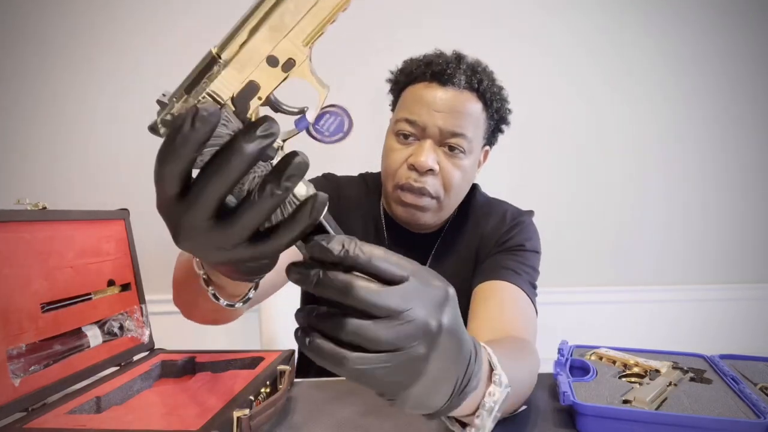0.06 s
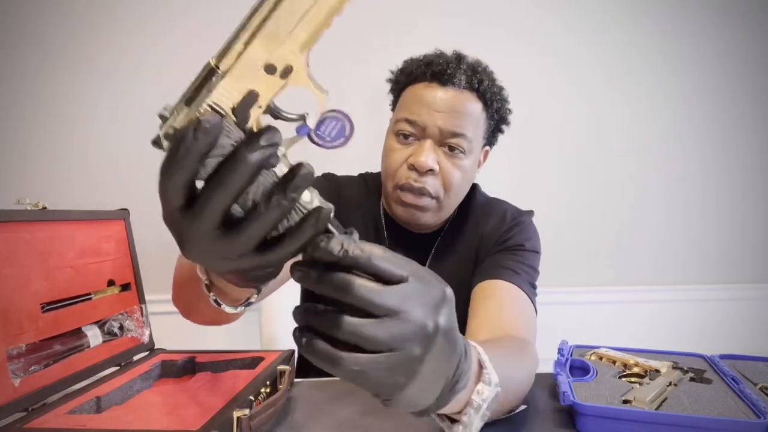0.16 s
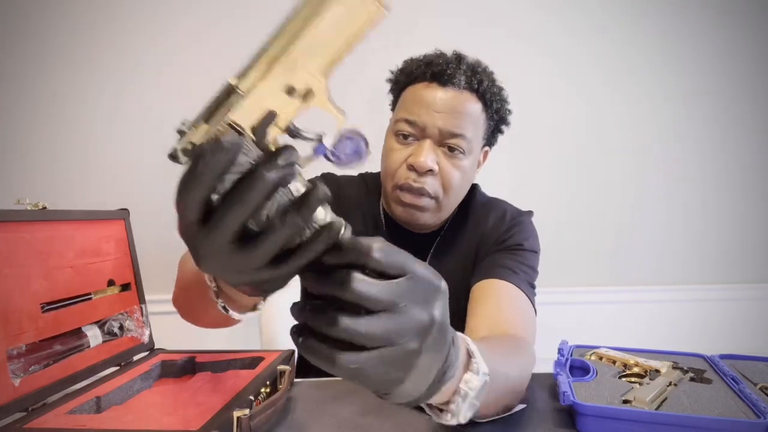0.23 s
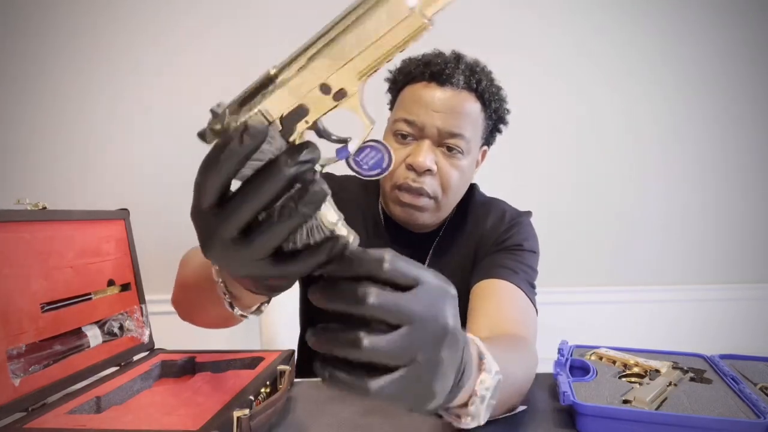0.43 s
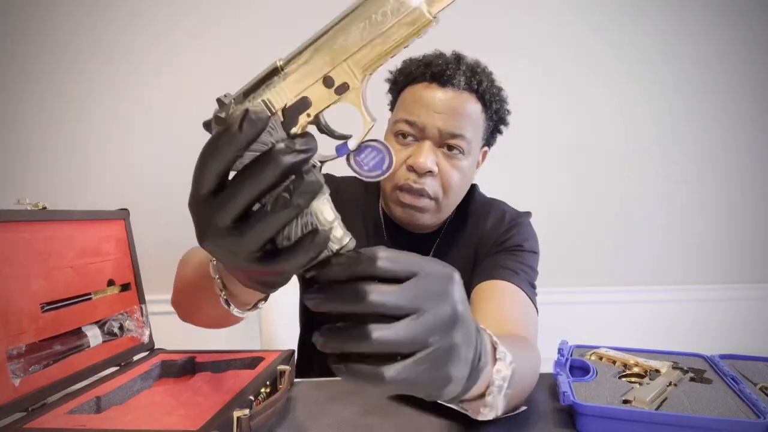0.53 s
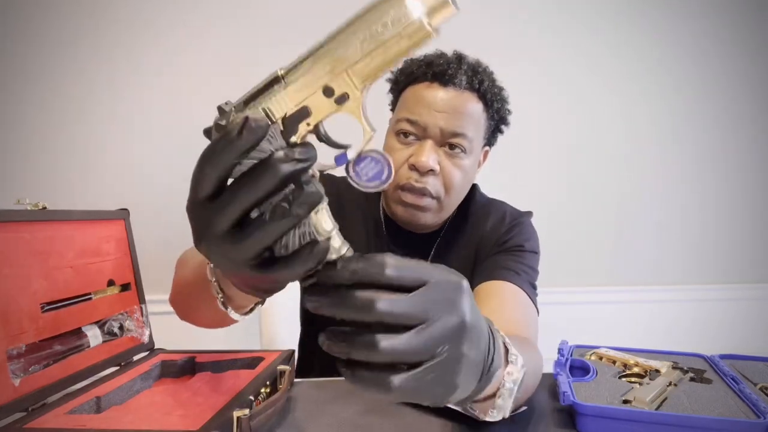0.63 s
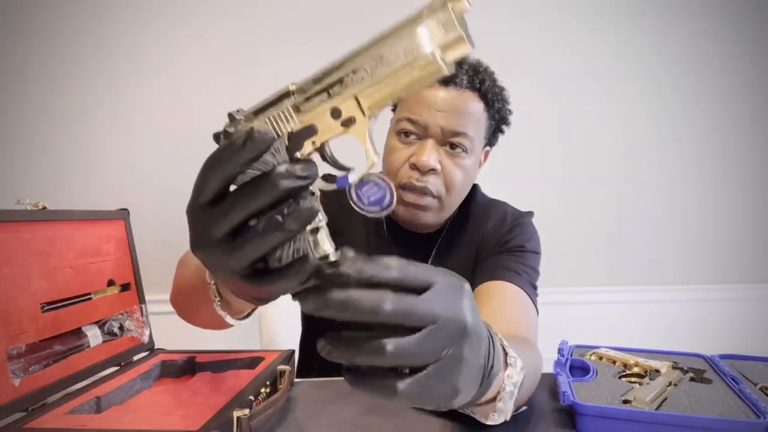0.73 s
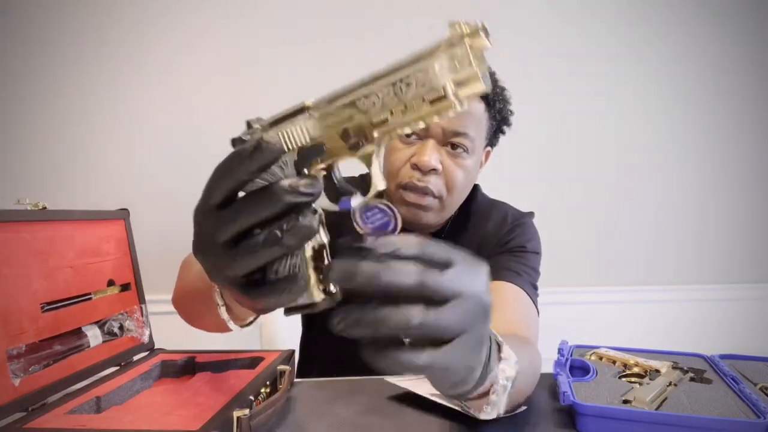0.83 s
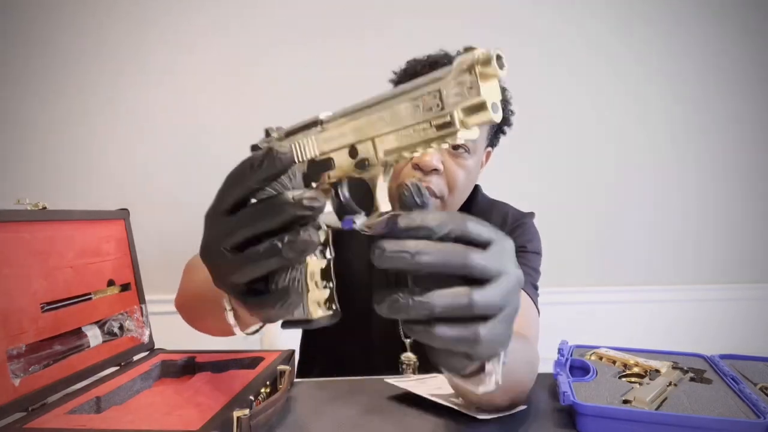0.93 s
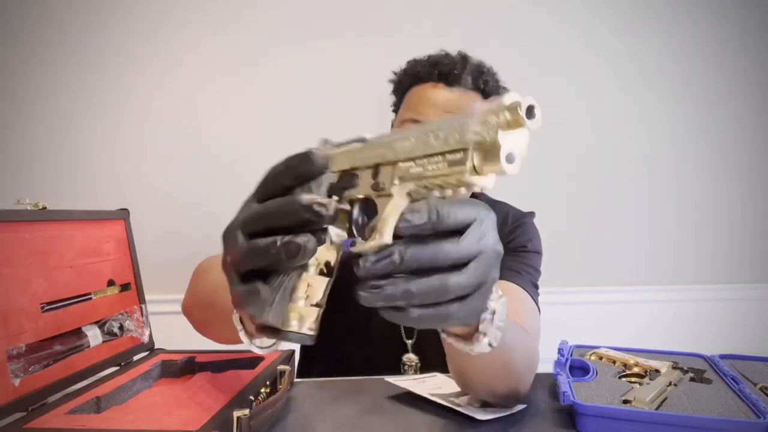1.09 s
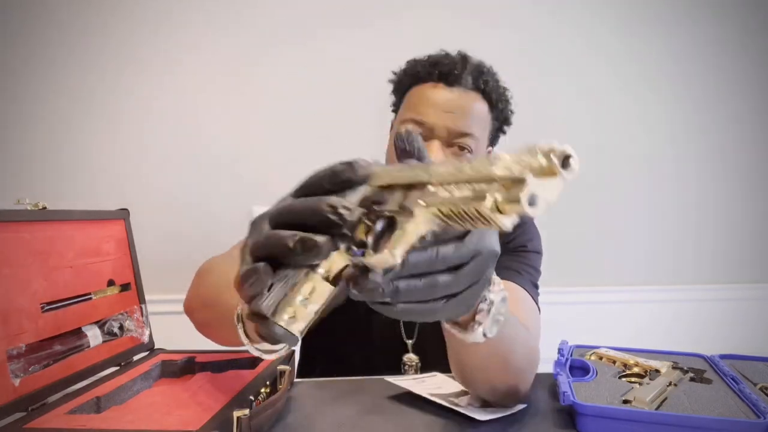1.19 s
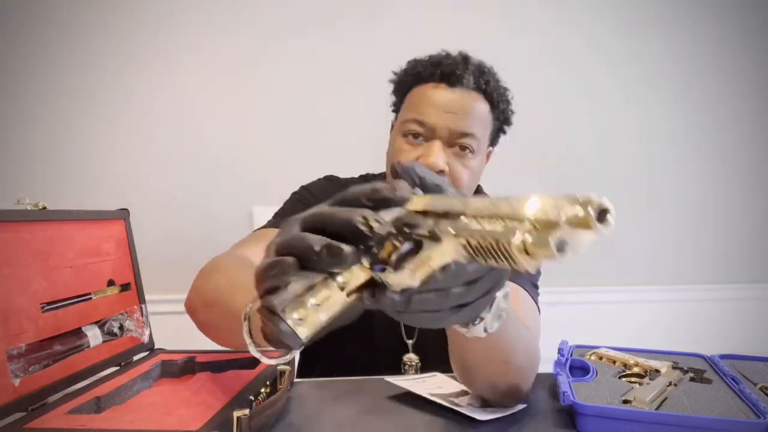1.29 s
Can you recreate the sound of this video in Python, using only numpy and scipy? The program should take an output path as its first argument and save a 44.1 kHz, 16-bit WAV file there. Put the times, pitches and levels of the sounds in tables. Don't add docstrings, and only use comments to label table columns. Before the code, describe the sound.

A magazine is pushed into a pistol: a light metal click, a brief scrape, then a loud double clack and bright short room ring; later a faint gloved pat and soft rustle, close stereo microphone, low hum.

```python
import sys
import numpy as np
from scipy import signal
from scipy.fft import rfft, irfft
from scipy.io import wavfile
from scipy.ndimage import uniform_filter1d

SR = 44100
rng = np.random.default_rng(int(sys.argv[2]) if len(sys.argv) > 2 else 0)


def persist_wave(psi):
    counts = np.round(np.clip(psi, -1, 1) * 32767).astype(np.int16)
    wavfile.write(sys.argv[1], SR, np.atleast_2d(counts).T)


def boost_factor(decibels):
    exponent = np.asarray(decibels, float) / 20
    return 10 ** exponent


N = 59535
LEAD = 8192
SIZE = N + LEAD

# frequency in Hz, level in dB per Hz.
AIR_COLOUR = [(25, -29), (60, 2.5), (130, -11), (300, -8.5), (480, -56), (900, -47)]
# frequency in Hz, left-right correlation.
AIR_LIKENESS = [(60, 0.72), (240, 0.36), (950, -1.5), (3770, -0.03), (15000, 0.17)]
# frequency in Hz, left over right in dB.
AIR_PAN = [(60, 12), (180, -16), (550, 62.5), (5000, 8), (15000, -7)]
# frequency in Hz, width in Hz, level in dB.
HUM_LINES = [(63, 6, -81), (128, 5, -72.5), (163.5, 6, -74.5), (207.4, 1.9, -66.5), (242, 29, -77.5),
             (320, 9.4, -76.5)]
# time in seconds, level in dB.
GLOVE_LEVEL = [(.5, -68), (.7, -72.5), (.74, -57), (.81, -67.5), (.9, -68.5), (.94, -64), (1.01, -74),
               (1.03, -79), (1.115, -79.5), (1.145, -59), (1.23, -67), (1.35, -65.5)]
# frequency in Hz, level in dB per Hz.
GLOVE_SPECTRUM = [(1000, -19), (2500, -14), (4000, -9), (6000, 0), (7500, -8), (10000, 1), (14000, -10),
                  (16000, -22)]

# frequency in Hz, time to fall 60 dB in seconds.
TAIL_T60 = [(500, 0.84), (1000, 0.32), (2000, 0.62), (4000, 0.54), (7000, 0.52), (11000, 0.41),
            (15000, 0.1)]
# frequency in Hz, level in dB.
TAIL_COLOUR = [(250, -25), (520, -4.5), (750, 1), (1200, 1.5), (2000, 0.5), (4500, -1), (15000, 1)]
# frequency in Hz, left-right correlation.
TAIL_LIKENESS = [(60, -0.045), (240, 1), (950, 0.45), (3770, -0.46), (15000, 0.13)]
# frequency in Hz, left over right in dB.
TAIL_PAN = [(60, 25.5), (180, 0), (550, -0.5), (1650, -3), (4970, 4.5), (15000, -3.5)]
MIRROR_S = [.0027, .0120, .0146, .0160, .0183, .0204, .0228, .0262, .0315]
# left level in dB, right level in dB.
MIRROR_LEVEL = [(-14, -7), (-8, -5), (-10.5, -13), (-12.5, -16.5), (-16.5, -19.5), (-19, -24),
                (-21.5, -22.5), (-13, -24.5), (-21.5, -12)]
# frequency in Hz, level in dB.
MIRROR_COLOUR = [(1200, -29.5), (2300, -6), (3100, 2), (4000, -4), (5200, -12.5), (7000, -12), (9500, -7.5),
                 (13000, -26)]
# frequency in Hz, level in dB.
STEEL_CLICK = [(600, -25.5), (1500, -12), (2400, -8), (3100, 0), (4300, 3.5), (6300, -2), (10000, -8),
               (15000, -9.5)]
# frequency in Hz, level in dB.
GLOVED_CLICK = [(500, -15.5), (750, -11), (1200, -7), (2200, 1), (3500, -12), (6000, -14.5), (12000, -23)]
# frequency in Hz, left over right in dB.
PORT_PAN = [(60, 22), (130, -8), (290, -14.5), (640, -8), (1410, 11), (3100, 3.5), (5000, 9), (7500, 1.5),
            (15000, -6)]
# frequency in Hz, width in Hz, depth in dB.
HOUSING_DIPS = [(8250, 950, -8), (12450, 1240, -38.5), (16300, 1300, -10.5)]

# time in seconds, level in dB.
SLIDE_LEVEL = [(.1, -69), (.15, -59), (.165, -52.5), (.19, -57), (.225, -52.5), (.233, -35), (.243, -37.5),
               (.25, -77)]
# frequency in Hz, level in dB.
SLIDE_MODES = [(600, -7), (1750, 8.5), (2500, -0.5), (3700, -3), (4750, -2.5), (5500, -0.5), (6720, -2.5)]
# frequency in Hz, width in Hz, level in dB.
LIP_MODES = [(1086, 83, -5), (1804, 590, -13.5), (2760, 400, -18), (3878, 310, 1.5), (4610, 430, -9.5),
             (5295, 320, -8), (7073, 110, -7), (6660, 210, -19.5), (9900, 1500, -18.5), (13500, 420, -27)]
GRAZE_MODES = [(1270, 500, -5), (2050, 1400, -2), (3900, 400, 5), (5340, 430, 5), (7200, 720, -10.5)]
KNOCK_MODES = [(1060, 270, -19), (1670, 290, -17), (2090, 280, -22.5), (4100, 620, -23.5)]
CATCH_MODES = [(1066, 840, -17.5), (1593, 370, -14), (2330, 120, -14.5), (4120, 130, -0.5), (5340, 400, 2),
               (6050, 300, -6), (6800, 100, -19.5), (9730, 280, -6.5), (11600, 170, -13.5),
               (13800, 520, -23.5), (15300, 240, -7)]
SEAT_MODES = [(1202, 2300, -21.5), (1923, 150, -13), (3148, 380, -1.5), (4778, 520, 1.5), (5770, 1200, -19),
              (6840, 130, -9), (9360, 660, -6.5), (10500, 900, -15), (14020, 860, -13.5),
              (15900, 1300, -11.5)]
PALM_MODES = [(704, 180, -2), (1040, 280, -9.5), (1663, 280, -2), (2223, 183, 1.5), (2970, 740, -6),
              (4150, 440, 0), (5470, 480, 0), (8010, 360, -13), (9430, 500, -12), (14460, 900, -27)]
HEEL_MODES = [(729, 260, -1.5), (1953, 500, -10)]
# start in seconds, peak in dB, crack in dB, click sent to the room in dB,
# left over right in dB.
BLOWS = [(-.12, -23.5, -19, -2, 3), (0.0922, -23, -5.5, -1.5, 6), (0.1557, -39, 1, 6.5, 9.5),
         (0.1642, -40.5, -3.5, -4.5, 0.5), (0.1664, -38.5, -7.5, 1.5, -7.5), (0.2069, -32.5, -37.5, -9, -3),
         (0.209, -39, -32.5, -4.5, -1), (0.229, -7, 0, -10.5, 1.5), (0.2438, -4.5, -6.5, 3, 5),
         (0.5092, -29, -8, 1.5, 4), (.5125, -39, -29.5, -9, 1)]
STRUCK = [SEAT_MODES, LIP_MODES, GRAZE_MODES, GRAZE_MODES, GRAZE_MODES, KNOCK_MODES, KNOCK_MODES,
          CATCH_MODES, SEAT_MODES, PALM_MODES, HEEL_MODES]

CRACK_S = 0.001195
TO_LEFT_RIGHT = np.array([[.5], [-.5]])


def rms_one(x):
    return x / np.sqrt(np.mean(x ** 2) + 1e-20)


def at_hz(points, hz):
    table_hz, value = np.array(points).T
    return np.interp(np.log(np.maximum(hz, 1)), np.log(table_hz), value)


def in_time(rows):
    return np.interp((np.arange(SIZE) - LEAD) / SR, *np.transpose(rows))


def highpass(x, order, hz):
    return signal.sosfilt(signal.butter(order, hz, "high", fs=SR, output="sos"), x)


def resonate(x, hz, width_hz):
    r = np.exp(-np.pi * width_hz / SR)
    poles = [1, -2 * r * np.cos(2 * np.pi * hz / SR), r * r]
    return signal.lfilter([(1 - r * r) / 2, 0, (r * r - 1) / 2], poles, x + 1e-18)


def coloured(x, db_at):
    size = x.shape[-1]
    return irfft(rfft(x) * boost_factor(db_at(np.arange(size // 2 + 1) * SR / size)), size)


def stereo_bands(gain_at, alike, balance, size):
    out = 0
    white = rng.standard_normal((2, 2, size))
    for k, low in enumerate(20 * 2 ** np.arange(0, 10, .5)):
        edges = [low, min(low * np.sqrt(2), 19000)]
        band = signal.butter(2, edges, "band", fs=SR, output="sos")
        mid, side = signal.sosfilt(band, white[k % 2])
        hz = low * 2 ** .25
        c = np.clip(at_hz(alike, hz), 0, 1)
        pan = boost_factor(at_hz(balance, hz) * TO_LEFT_RIGHT)
        pair = np.sqrt(1 + c) * mid + np.sqrt(1 - c) * side * [[1], [-1]]
        out = out + gain_at(hz) * pan * pair
    return out


def air():
    level_db, top_hz, steady = -63, 1000, .6
    tone_bands = stereo_bands(lambda hz: boost_factor(at_hz(AIR_COLOUR, hz)) / (1 + (hz / top_hz) ** 6),
                              AIR_LIKENESS, AIR_PAN, SIZE)
    out = boost_factor(level_db) * rms_one(tone_bands)
    for hz, width_hz, db in HUM_LINES:
        line = resonate(rng.standard_normal(SIZE + SR), hz, 2 * width_hz)
        line = resonate(line, hz, 2 * width_hz)[SR:]
        tone = np.sqrt(2) * np.sin(2 * np.pi * hz * np.arange(SIZE) / SR)
        out += boost_factor(db + np.array([[2.5], [-2.5]])) * (steady * tone + (1 - steady) * rms_one(line))
    return out


def gloves():
    hiss = stereo_bands(lambda hz: boost_factor(at_hz(GLOVE_SPECTRUM, hz) - 60 * (hz < 900)),
                        [(100, 0.32), (9000, 0.1)], AIR_PAN, SIZE)
    return boost_factor(in_time(GLOVE_LEVEL)) * rms_one(hiss)


def room(x):
    level_db, near_db, wall_s = -16.5, -9.5, .0125
    early_db, early_s, early_per_s = 4, 0.0046, 900
    t = np.arange(SR) / SR
    tail = stereo_bands(lambda hz: boost_factor(at_hz(TAIL_COLOUR, hz) - 60 * t / at_hz(TAIL_T60, hz)),
                        TAIL_LIKENESS, TAIL_PAN, SR)
    arrivals = rng.random(SR) < early_per_s / SR
    echoes = uniform_filter1d(arrivals * SR / early_per_s, size=12)
    early = boost_factor(early_db) * np.exp(-np.abs(t - wall_s) / early_s) * np.sqrt(echoes)
    tail *= np.where(t < wall_s, boost_factor(near_db), 1 + early)
    return boost_factor(level_db) * signal.fftconvolve(x[None], tail, axes=1)[:, :len(x)]


def mirrors(x):
    thin = coloured(x, lambda hz: at_hz(MIRROR_COLOUR, hz))
    out = 0
    for s, (left_db, right_db) in zip(MIRROR_S, MIRROR_LEVEL):
        out = out + boost_factor(np.array([[left_db], [right_db]])) * np.roll(thin, int(s * SR))
    return out


def slide():
    ticks_per_s, t60_s = 2600, .006
    strength = boost_factor(4.0 * np.minimum(rng.exponential(1, SIZE), 5)) * rng.choice([-1, 1], SIZE)
    ticks = strength * (rng.random(SIZE) < ticks_per_s / SR)
    dealt = rng.integers(0, len(SLIDE_MODES), SIZE)
    rub = 0
    for k, (hz, db) in enumerate(SLIDE_MODES):
        rub = rub + boost_factor(db) * resonate(ticks * (dealt == k), hz, 2.5 / t60_s)
    return boost_factor(in_time(SLIDE_LEVEL)) * rms_one(rub)


def contact(modes, crack_db):
    crack_low_hz, body_low_hz = 930, 780
    late_cycles, latest_s, right_lag_s = 3.5, 0.00079, -0.00013
    t = np.arange(1024) / SR
    crack = rng.standard_normal((2, 1024)) * t / CRACK_S * np.exp(1 - t / CRACK_S)
    out = boost_factor(crack_db - 6.5) * highpass(crack, 2, crack_low_hz)
    for hz, width_hz, db in np.maximum(modes, [0, 220, -99]):
        age = np.maximum(t - min(late_cycles / hz, latest_s), 0) * np.pi * width_hz * 1.195
        lag = 2 * np.pi * hz * right_lag_s * np.array([[0], [1]])
        wave = np.sin(2 * np.pi * hz * t + rng.uniform(0, 2 * np.pi) + lag)
        out += boost_factor(db) * width_hz / 500 * age * np.exp(1 - age) * wave
    out = highpass(out, 5, body_low_hz)
    return out / np.abs(out).max()


def scene():
    ring_db, ring_top_hz = -15, 950
    rub = slide()
    direct, sent = np.stack([rub, rub]), rub.copy()
    steel, gloved = np.zeros((2, SIZE))
    for (s, db, crack_db, sent_db, pan_db), modes in zip(BLOWS, STRUCK):
        blow = boost_factor(db) * contact(modes, crack_db)
        i = int(s * SR) + LEAD
        direct[:, i:i + 1024] += blow * boost_factor(pan_db * TO_LEFT_RIGHT)
        sent[i:i + 1024] += boost_factor(sent_db / 2) * blow[0]
        clicks = gloved if modes in (KNOCK_MODES, PALM_MODES, HEEL_MODES) else steel
        clicks[i + int(CRACK_S * SR)] += boost_factor(db + sent_db)
    left = coloured(direct[0], lambda hz: at_hz(PORT_PAN, hz) / 2)
    right = coloured(direct[1], lambda hz: -at_hz(PORT_PAN, hz) / 2)

    to_room = coloured(sent, lambda hz: ring_db - 10 * np.log10(1 + (hz / ring_top_hz) ** 6))
    to_room = to_room + coloured(steel, lambda hz: at_hz(STEEL_CLICK, hz))
    to_room = to_room + coloured(gloved, lambda hz: at_hz(GLOVED_CLICK, hz))
    wet = room(to_room) + mirrors(sent) + gloves() + air()
    wet = coloured(wet, lambda hz: sum(db * np.exp(-((hz - at) / w) ** 2 * 2)
                                       for at, w, db in HOUSING_DIPS))
    return (np.stack([left, right]) + wet)[:, LEAD:]


def roll_off(x):
    return signal.sosfilt(signal.butter(12, 16970, fs=SR, output="sos"), x)


def record(dry):
    knee, top, cutoff_hz = .6, .92, 16500
    size = np.abs(dry)
    rounded = np.sign(dry) * (knee + (top - knee) * np.tanh((size - knee) / (top - knee)))
    x = np.where(size < knee, dry, rounded)
    x = signal.sosfilt(signal.cheby2(10, 60, cutoff_hz + 1500, fs=SR, output="sos"), x)
    return roll_off(x)


dry = scene()
out = record(dry)
persist_wave(out)
```